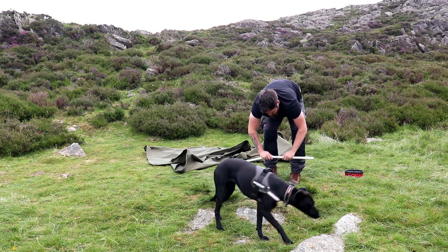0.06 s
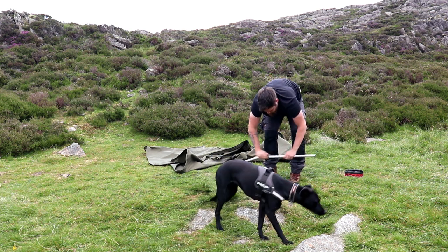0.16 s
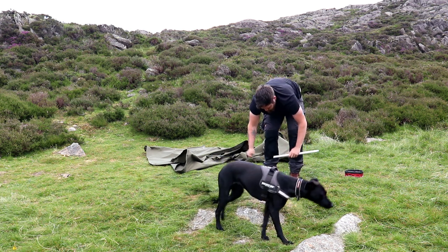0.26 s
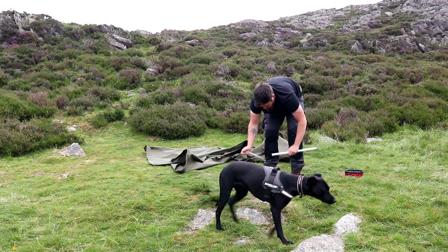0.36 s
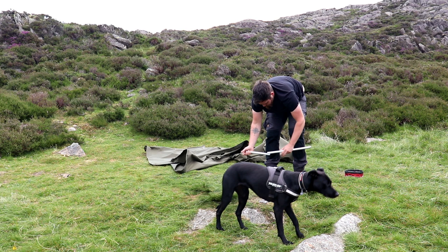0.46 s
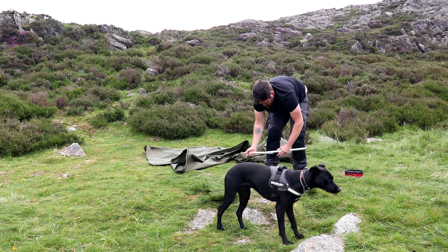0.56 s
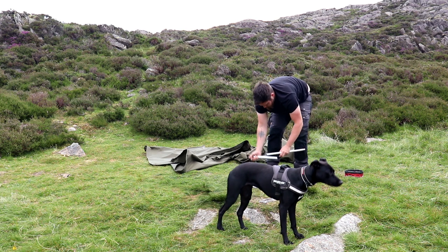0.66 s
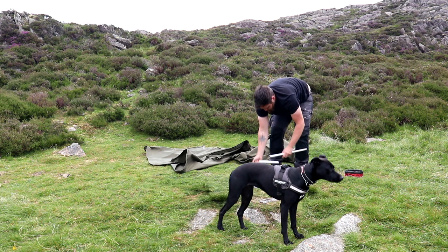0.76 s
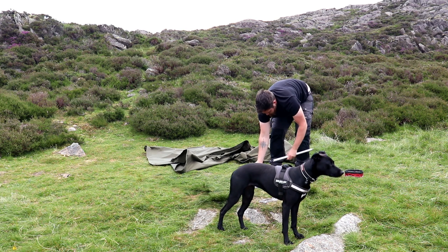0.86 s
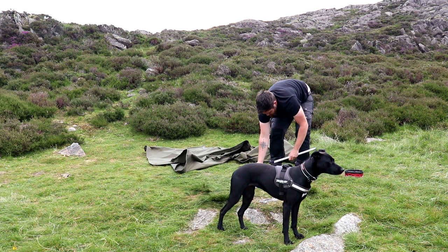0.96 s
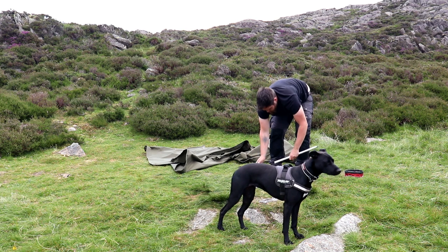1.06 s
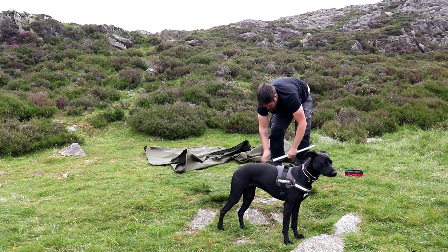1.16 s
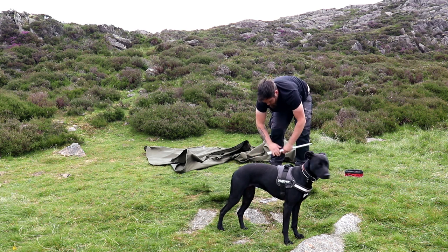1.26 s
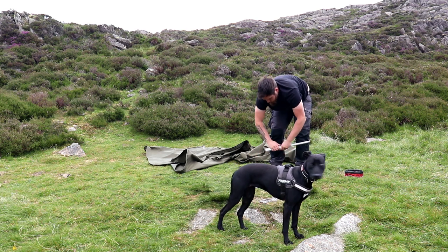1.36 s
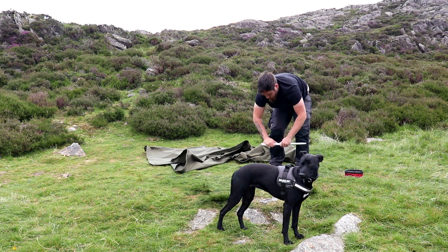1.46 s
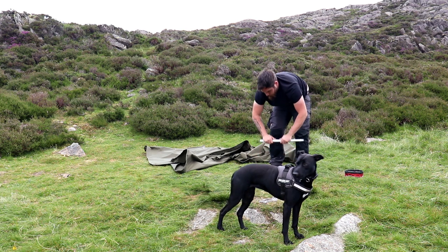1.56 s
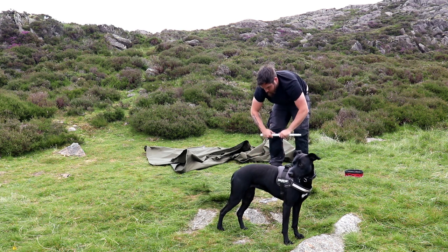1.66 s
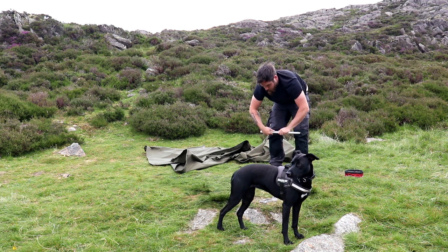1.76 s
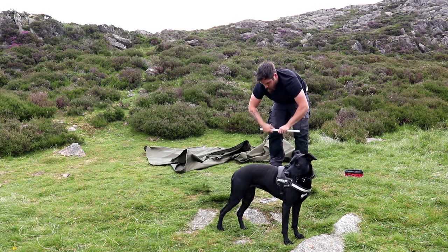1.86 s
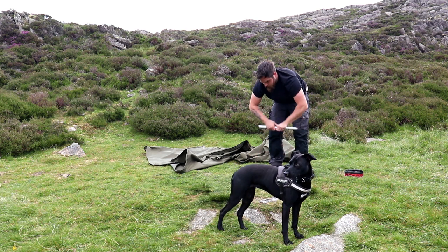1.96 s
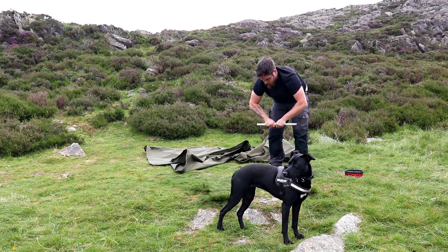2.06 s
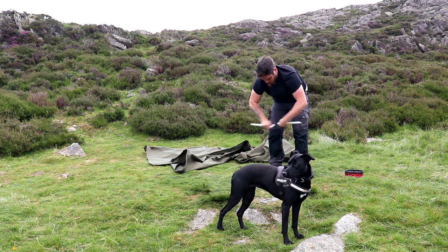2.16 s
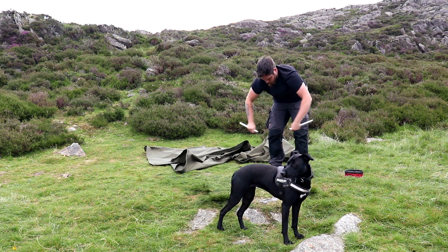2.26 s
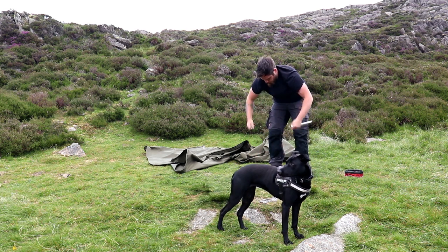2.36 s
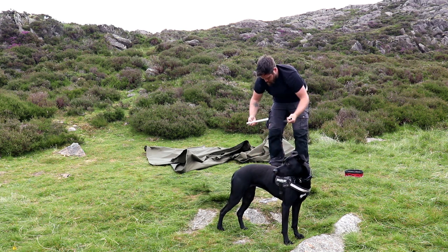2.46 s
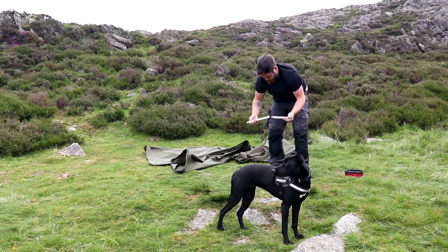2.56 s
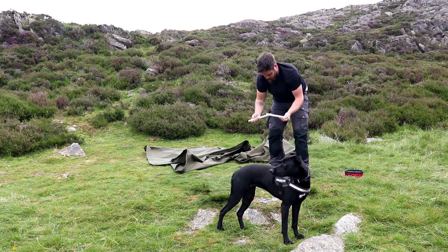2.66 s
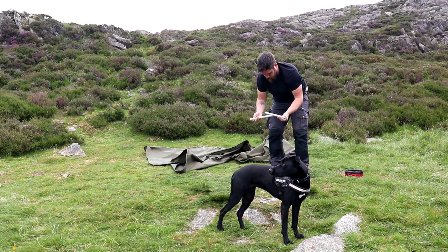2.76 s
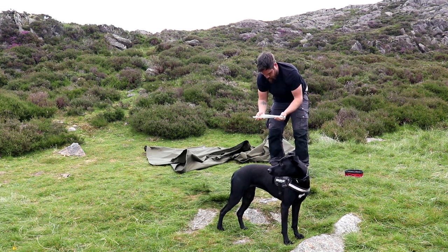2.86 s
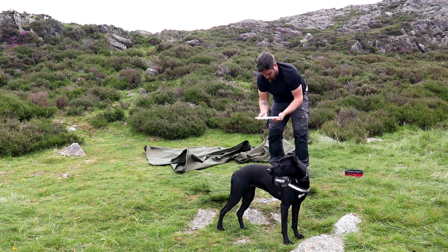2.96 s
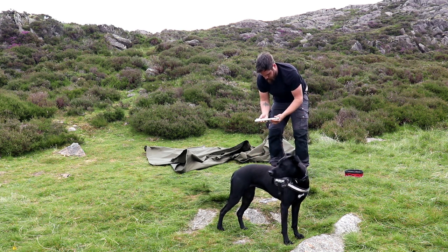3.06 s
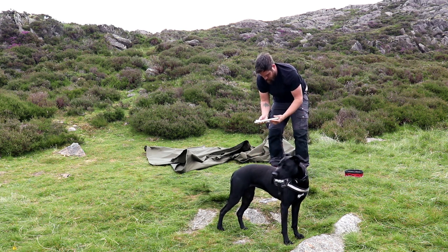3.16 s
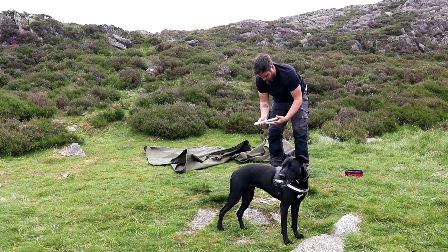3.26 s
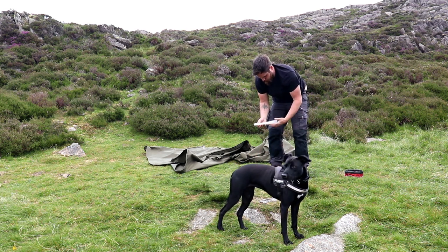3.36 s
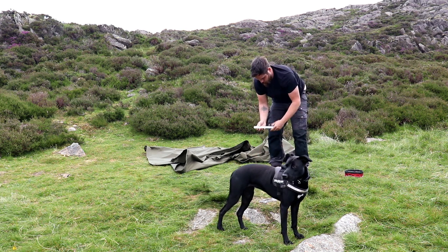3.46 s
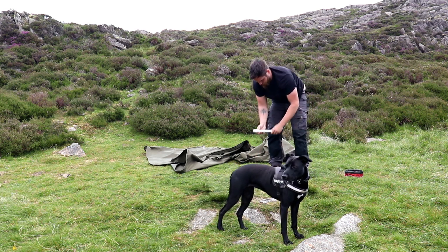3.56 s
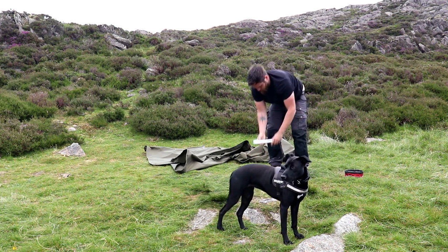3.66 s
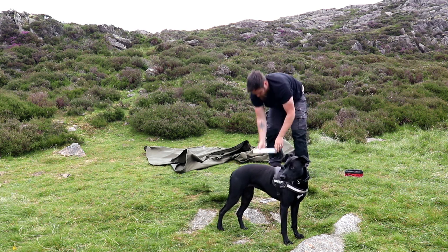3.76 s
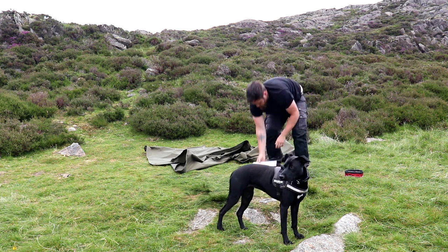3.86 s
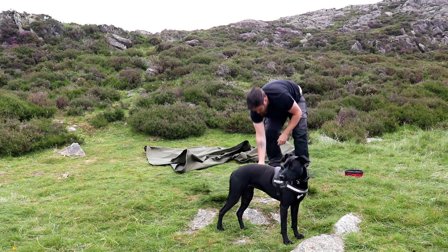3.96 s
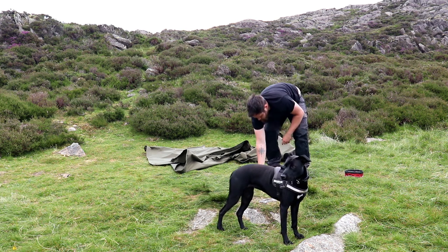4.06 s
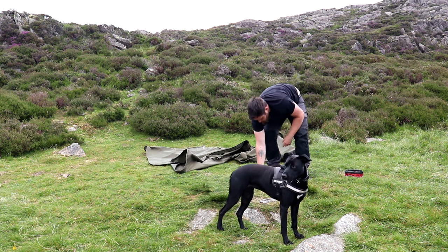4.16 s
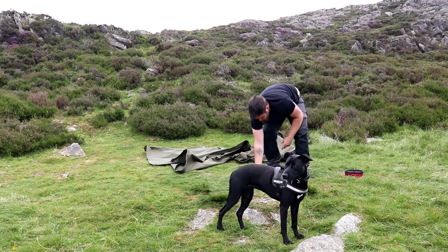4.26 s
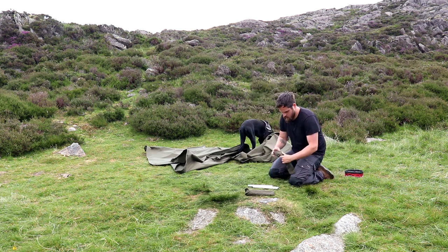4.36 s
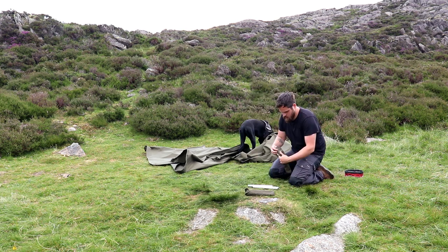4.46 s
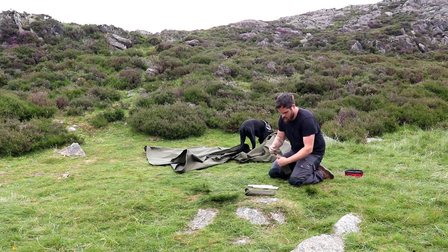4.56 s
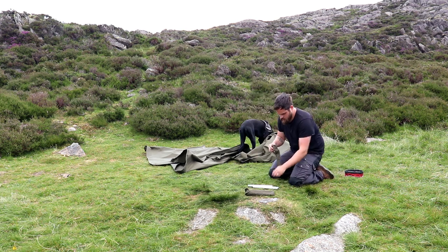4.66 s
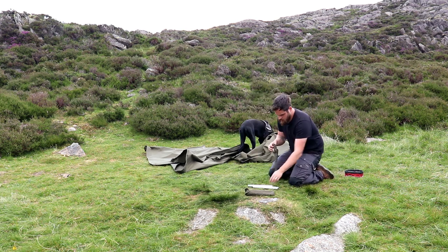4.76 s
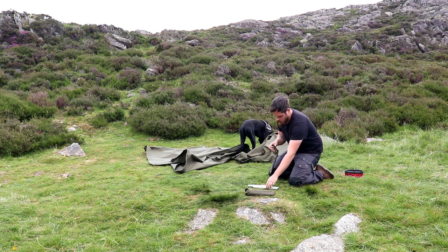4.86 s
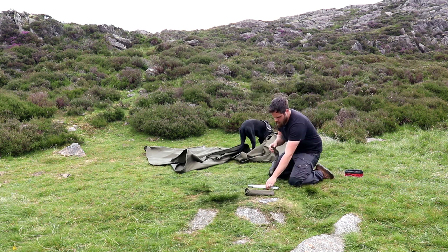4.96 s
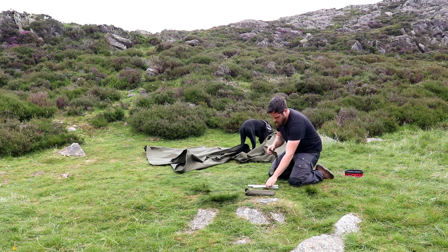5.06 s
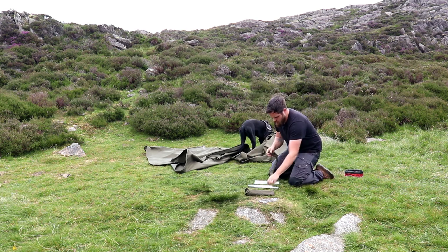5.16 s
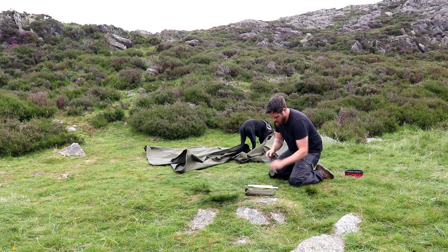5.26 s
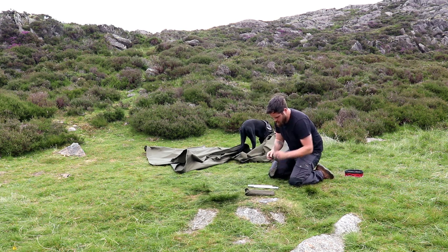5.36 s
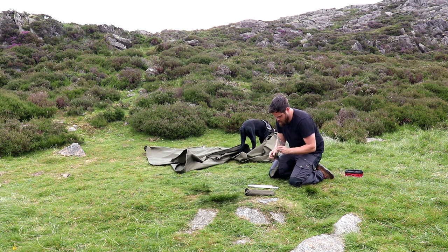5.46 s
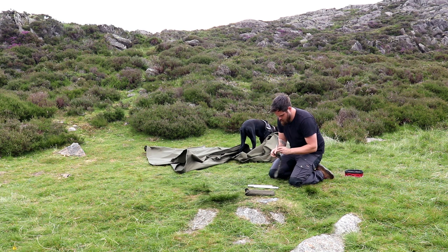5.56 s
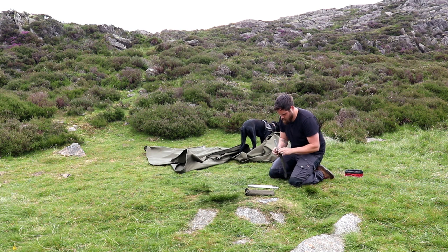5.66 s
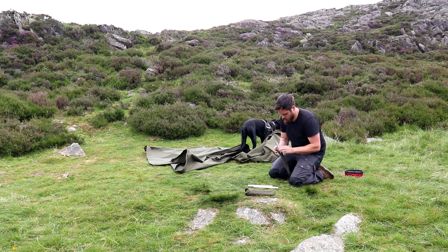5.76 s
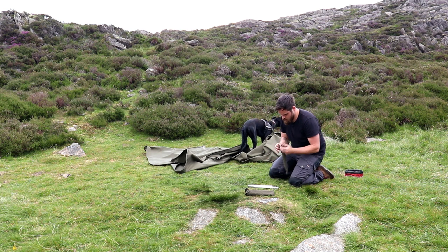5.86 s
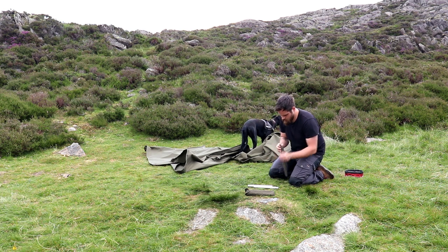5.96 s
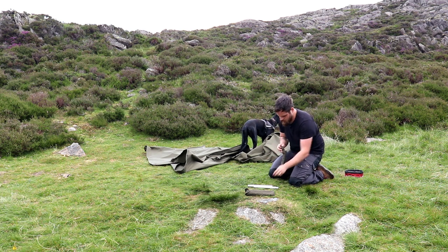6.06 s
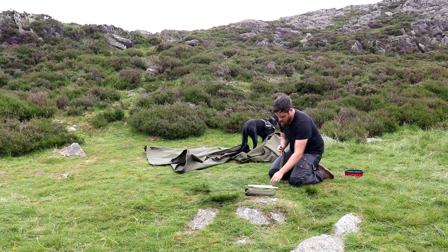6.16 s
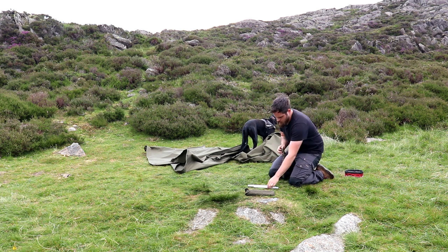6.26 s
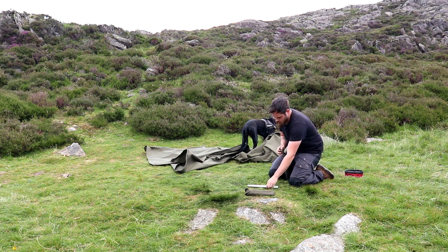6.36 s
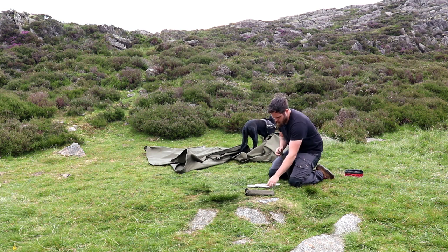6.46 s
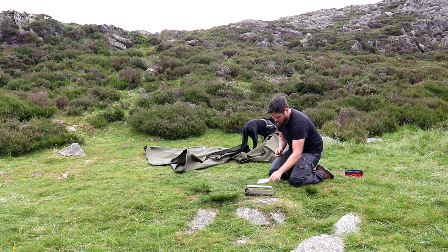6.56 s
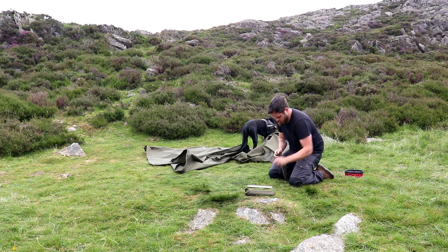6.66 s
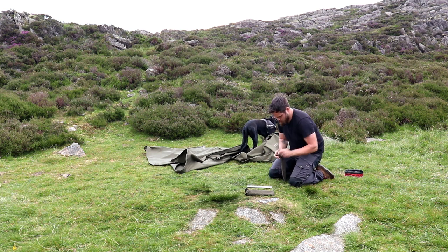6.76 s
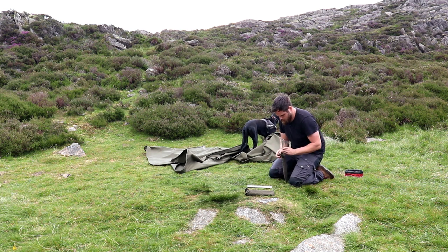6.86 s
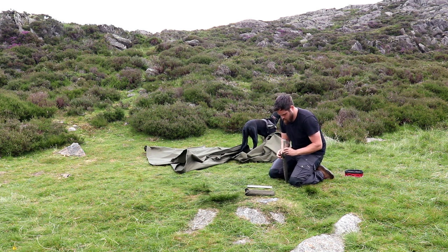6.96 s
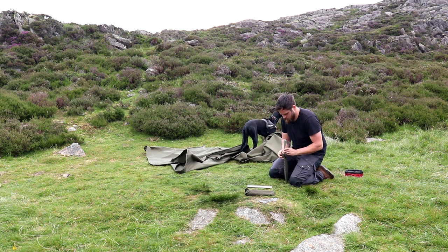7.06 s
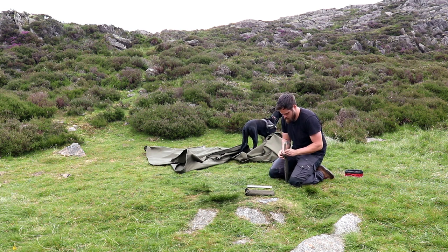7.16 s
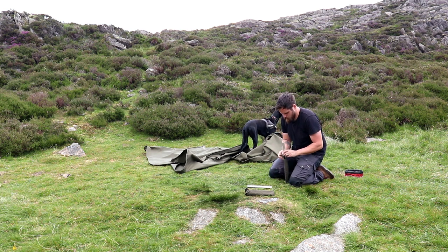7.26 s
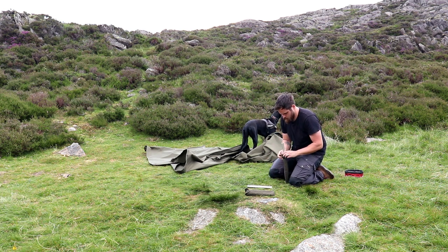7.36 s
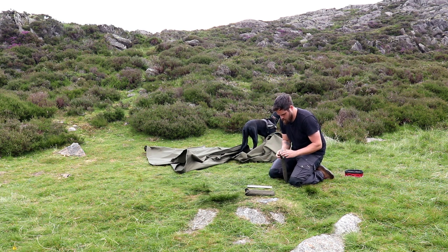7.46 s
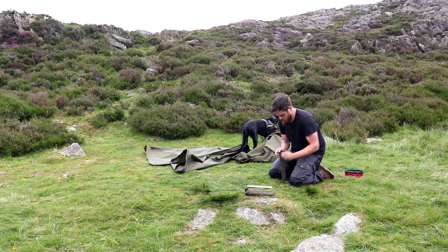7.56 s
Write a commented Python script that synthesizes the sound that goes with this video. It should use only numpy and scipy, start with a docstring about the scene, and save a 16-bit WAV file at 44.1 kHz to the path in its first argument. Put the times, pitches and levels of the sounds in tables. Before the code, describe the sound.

Thin metal tent pole sections click, clink and rattle brightly as they are pulled apart and gathered on a quiet, breezy open hillside.

```python
"""A soft wind rumble and airy hiss come first, then a metal joint clicks and jerks loose on a quiet hillside.
Tent pole sections are pulled apart, gathered in the hand, slid together and laid down. Each contact sets
decaying tube modes ringing and beating until the next touch or the hand stops them, and cracks sharply.
Filtered noise makes the knocks, a short squeak, scrapes, rustles of clothes and grass, breeze and air;
damped sines make the thuds, and swooping sines a small bird far off."""
import sys
import numpy as np
from scipy import signal
from scipy.fft import rfft, irfft
from scipy.io import wavfile
from scipy.ndimage import uniform_filter1d

SR = 44100
rng = np.random.default_rng(int(sys.argv[2]) if len(sys.argv) > 2 else 0)


def unload_audio(sound):
    """Save the sound as a 16-bit wav file, at the path given as the first command line argument."""
    columns = np.transpose(np.atleast_2d(sound))
    # keep every value between -1 and 1, then stretch to whole-number steps
    steps = np.round(np.clip(columns, -1, 1) * 32767)
    wavfile.write(sys.argv[1], SR, steps.astype(np.int16))


N = 335601
TIME, HZ = np.arange(N) / SR, np.fft.rfftfreq(N, 1 / SR)

# clinks of loose tubes: picked up and gathered, slapped in the palm, dropped on the pile, handled at the end:
# (time [s], lowest mode level [dB], second mode level [dB], upper modes level [dB], crack level before
# the common crack gain [dB], t60 before its floor [s], shorter tube's share of the ring [0-1],
# length of the rattle that follows [s])
CLINKS = [ (1.0906, -32.5, -28, -32, -38, .3, 0.52, 0.0042),
          (1.116, -28.5, -31.5, -42, -49, 1, 0.94, 0.016), (1.149, -25, -45, -36.5, -36, 0.19, 1, 0.012),
          (1.166, -24.5, -35, -35.5, -38, 0.17, .6, 0.0023),
          (1.177, -34, -27.5, -32, -38, 0.37, 0.97, 0.0017),
          (1.192, -30.5, -26.5, -24.5, -27.5, 0.49, 0.92, .02),
          (1.2134, -29.5, -26.5, -26.5, -30.5, 0.17, .7, 0.057),
          (1.271, -42.5, -42.5, -46, -68, 0.22, .97, 0), (1.313, -18, -41, -36.5, -53, 0.24, 0, 0.016),
          (1.326, -20.5, -50, -23, -33, 0.14, 0.16, 0.0033), (1.339, -24, -37, -33.5, -33, 0.24, 0.02, 0),
          (1.376, -29, -38.5, -35.5, -38, 0.12, 0, 0.054), (1.427, -35, -61, -50, -60, .3, 0.4, 0.0038),
          (1.525, -55.5, -68, -56, -50, .22, .6, 0.0027), (1.634, -54, -70, -64, -65, .5, 0.81, 0.033),
          (1.681, -46.5, -58, -49, -62, 0.15, .5, 0), (1.726, -33.5, -45.5, -42, -37.5, .18, 0.82, 0.016),
          (3.4598, -16.5, -34, -15.5, -24, 0.078, 0.01, 0.0013),
          (3.4792, -18, -17.5, -19.5, -20, 0.043, 0.82, 0.00078),
          (3.4865, -22.5, -26, -26, -25, .06, 0.69, 0.0023), (3.4934, -26, -18, -22, -30, 0.023, 0.7, .012),
          (3.5167, -46.5, -61, -51, -48, 0.23, 0.1, 0.037),
          (3.581, -62, -43, -48.5, -52, 0.062, 0.73, 0.0035),
          (3.589, -52, -55, -58.5, -43.5, .13, .5, 0.0122), (3.788, -38.5, -49.5, -41, -43, 0.1, 0.3, 0),
          (4.2353, -23, -36, -43, -40, .2, 0.02, 0), (4.243, -19.5, -25, -27.5, -25, .25, 0.67, 0.0014),
          (4.2591, -25, -22, -15, -26, .2, 1, 0.0083), (4.2621, -16, -29, -18.5, -20, 0.16, 0.63, .004),
          (4.2718, -19, -34, -20, -30, 0.27, .3, 0.0076),
          (4.2919, -19.5, -15.5, -23, -30, 0.19, 0.13, 0.0003),
          (4.3085, -16, -33.5, -26, -35.5, 0.26, 0.99, 0.0022),
          (4.3142, -17.5, -29.5, -25.5, -29.5, 0.31, 0.78, 0.025),
          (4.346, -16, -39, -28, -33, 0.32, .43, 0.00084), (4.36, -15.5, -32, -27, -37, 0.0084, 0.5, 0),
          (5.238, -45, -57, -56, -54, 0.062, 0.3, 0.0059),
          (6.3747, -29, -57, -31.5, -38, 0.056, 0.21, 0.00087),
          (6.3834, -38, -44, -28, -33, .085, 0, 0.028), (6.453, -48.5, -55, -41, -45, 0.087, 0.1, 0.0048),
          (7.2514, -31.5, -39.5, -59, -39, .03, 0.19, 0.013),
          (7.435, -53, -48, -45, -48, .15, 0.31, 0.00059), (7.46, -54, -50, -48, -49, 0.74, 0.05, 0.025),
          (7.4912, -23.5, -44, -37, -34, 0.22, 0.02, 0.052),
          (7.549, -31.5, -51, -38.5, -46, 0.05, 0.25, 0.0077),
          (7.564, -32, -55, -39, -38.5, 0.077, .3, 0.017), (7.584, -47, -51, -42.5, -43, 0.23, 0.28, .02)]


def amp(db):
    """Decibels to gain."""
    return 10 ** (np.asarray(db) / 20)


def evened(x):
    """Scales to rms 1."""
    return x / np.sqrt(np.mean(x ** 2) + 1e-20)


def add(mix, s, sound):
    """Mixes a sound in at time s, cutting it off at the end of the mix."""
    part = mix[max(round(s * SR), 0):][:len(sound)]
    part += sound[:len(part)]


def noise(points):
    """Steady noise of rms 1 with the given spectrum."""
    hz, db = np.transpose(points)
    gain = amp(np.interp(np.log(HZ + 1), np.log(hz), db))
    return evened(irfft(rfft(rng.standard_normal(N)) * gain, N))


def hump(x, hz, octaves, steepness=2.35):
    """Colours x with one broad resonance whose skirts fall steeply, at rms 1."""
    away = np.log2((np.fft.rfftfreq(len(x), 1 / SR) + 1) / hz) / octaves
    gain = 1 / (1 + away ** 2 / steepness) ** steepness
    return evened(irfft(rfft(x) * gain, len(x)))


def causal(points, size=2048):
    """The shortest click (minimum phase) that has the given spectrum, with energy 1."""
    hz, db = np.transpose(points)
    bins_hz = abs(np.fft.fftfreq(size, 1 / SR))
    log_gain = np.log(amp(np.interp(np.log(bins_hz + 1), np.log(hz), db)))
    click = np.fft.ifft(np.exp(np.conj(signal.hilbert(log_gain)))).real[:size // 2]
    return click / np.linalg.norm(click)


def grains(depth_db):
    """Friction: noise that catches and slips in grains of a few milliseconds."""
    slip = evened(uniform_filter1d(rng.standard_normal(N), size=130))
    return evened(rng.standard_normal(N) * amp(depth_db * slip))


def hillside(air_db=-56.5, side_db=-17.5, breeze_db=-3, breeze_hz=41.3, breeze_octaves=1.):
    """Even hiss of open air and a soft rumble of wind, nearly the same in both ears."""
    # spectrum of the open air: (frequency [Hz], relative level [dB per Hz])
    air = [(15, -34), (25, -7.5), (70, -9), (134, -9.5), (263, -9.5), (344, -10), (373, -9.5), (531, -12),
           (1190, -15.5), (1520, -14.5), (1650, -17), (4370, -21), (7110, -21.5), (16000, -27.5)]
    # breeze on the microphone: (time [s], level before the breeze_db trim [dB])
    breeze = [(0.0, -71), (0.08, -62.5), (2.82, -54.5), (3.85, -72), (4.0, -52), (4.32, -68), (4.36, -61),
              (5.16, -66), (6.84, -74), (6.94, -54.5), (7.03, -67), (7.6, -60)]
    gust = amp(np.interp(TIME, *np.transpose(breeze)) + breeze_db)

    def air_and_wind():
        """One independent layer of hiss and rumble."""
        rumble = hump(rng.standard_normal(N), breeze_hz, breeze_octaves)
        return amp(air_db) * noise(air) + gust * rumble

    mid, side = air_and_wind(), amp(side_db) * air_and_wind()
    return np.array([mid + side, mid - side])


def held_ring(blows, modes):
    """Sections gripped in both hands give a short, choked ring of damped sines."""
    t, out = np.arange(SR // 6) / SR, np.zeros(N)
    for s, low_db, other_db, t60, pitch, rise in blows:
        for k, (hz, db, lasting) in enumerate(modes):
            level_db = (other_db if k else low_db) + db
            swing = amp(level_db - 60 * t / (t60 * lasting)) * (1 - np.exp(-t / rise))
            wave = np.sin(2 * np.pi * (hz * pitch * t + rng.random()))
            add(out, s, np.sqrt(2) * swing * wave)
    return out


def scrapes(strokes, spectrum, rise_s=0.00048, grain_db=1.0):
    """Metal drags over metal. Each stroke is (s, dB, hold s, t60 s): it holds, then dies away."""
    t, level = np.arange(SR // 4) / SR, np.zeros(N)
    for s, db, hold_s, t60 in strokes:
        fall_db = 60 * np.maximum(t - hold_s, 0) / t60
        add(level, s, amp(db - fall_db) * (1 - np.exp(-t / rise_s)))
    return level * signal.oaconvolve(grains(grain_db), causal(spectrum))[:N]


def joint(scrape_db=-3.0, hold_s=0.0049, release_s=0.024):
    """The joint is worked loose in jerks; each one rings and scrapes briefly."""
    # modes of two sections still joined: (frequency [Hz], relative level [dB], factor on t60 [ratio])
    joined_modes = [(1296, -10, 0.53), (2000, -4, 0.73), (2620, -1.5, 1.04), (2760, 2, 0.39),
                    (4050, -29, 0.46), (4400, 7.5, 0.39), (5300, 6, 0.31), (6770, -4.5, 2.05),
                    (7970, -4, 1.2)]
    # jerks at the joint: (time [s], lowest mode level [dB], other modes level [dB], t60 [s],
    # pitch factor [ratio], rise [s])
    jerks = [(0.182, -43, -32.5, 0.04, 1.04, 0.0011), (.1885, -33, -38.5, 0.057, 1.005, 0.00028),
             (2.186, -33, -31.5, 0.033, 1.05, 0.0014), (2.1986, -36, -29, 0.017, 1.02, 0.00028),
             (2.2062, -26, -33, 0.011, 1.36, 0.00042)]
    # scrape of wall on wall: (frequency [Hz], relative level [dB per Hz])
    wall_spectrum = [(200, -24), (900, -10.5), (2500, -1), (4300, -6), (7000, 0.5), (11000, -12.5),
                     (16000, -20)]
    strokes = [(s, db + scrape_db, hold_s, release_s) for s, _, db, *_ in jerks]
    return held_ring(jerks, joined_modes) + scrapes(strokes, wall_spectrum)


def thuds(rise_s=0.00045):
    """Hollow pops of the air in a tube and thuds on the turf: one low damped swing each."""
    # (time [s], level [dB], frequency [Hz], t60 [s])
    low_hits = [(0.182, -54, 176, 0.29), (1.044, -37.5, 208, 0.024), (1.064, -22.5, 253, 0.011),
                (1.069, -44.5, 172, 0.094), (1.192, -44.5, 615, 0.11), (1.312, -42.5, 339.5, 0.39),
                (2.185, -39, 185, 0.087), (2.208, -50, 620, 0.21), (7.249, -51.5, 344, 0.28)]
    t, out = np.arange(SR // 3) / SR, np.zeros(N)
    for s, db, hz, t60 in low_hits:
        swing = amp(db - 60 * t / t60) * (1 - np.exp(-t / rise_s))
        add(out, s, np.sqrt(2) * swing * np.sin(2 * np.pi * hz * t))
    return out


def bird(swoop_from=.83, swoop_to=.66, turn=.7, waver=.017):
    """Thin, distant whistles: sines whose pitch swoops up and down with a fine random waver."""
    # syllables: (time [s], length [s], level [dB], top pitch before smoothing and waver [Hz],
    # share of the syllable held low before the rise [0-1])
    syllables = [(0.303, 0.08, -58, 6500, 0), (.489, 0.039, -55.5, 6200, 0.028),
                 (0.595, 0.086, -55.5, 5700, 0.45), (.796, .03, -61, 5900, 0), (.915, .035, -64, 6300, 0),
                 (4.409, 0.084, -58.5, 7150, .3)]
    out = np.zeros(N)
    drift = 1 + waver * evened(uniform_filter1d(rng.standard_normal(N), size=60))
    for s, length, db, top_hz, held in syllables:
        u = np.linspace(0, 1, round(length * SR))
        # start and end pitch are shares of the top, which comes at the turn of the syllable
        swoop = np.interp(u, [held, np.clip(turn, held, 1), 1], [swoop_from, 1, swoop_to])
        hz = top_hz * uniform_filter1d(swoop, size=400) * drift[round(s * SR):][:len(u)]
        whistle = np.sin(2 * np.pi * np.cumsum(hz) / SR)
        add(out, s, np.sqrt(2) * amp(db) * signal.windows.tukey(len(u), .4) * whistle)
    return out


def rustles(grain_db=2.5):
    """Each stroke over cloth, grass or a tube swells and fades as friction noise in one band."""
    # cloth and grass rustle (wide bands), a rubbed tube sings (narrow bands):
    # (time [s], length [s], level before the fades [dB], centre [Hz], width [octaves])
    rubs = [(0.385, 0.22, -51, 530, 1.9), (0.694, 0.12, -51.5, 900, 1.33), (0.775, 0.071, -46.5, 646, 1.7),
            (1.187, 0.073, -42.5, 3000, 0.66), (1.703, 0.044, -46.5, 2000, 0.33),
            (1.818, 0.36, -61, 1506, 0.21), (3.125, 0.052, -52.5, 1200, 0.11), (3.577, .11, -57, 3900, 1.5),
            (4.442, 0.22, -59, 1894, 1.7), (5.648, 0.091, -51.5, 2270, 1.8), (5.702, 0.64, -65, 300, 1),
            (5.833, 0.22, -53.5, 1200, 2), (6.168, 0.38, -58, 614, 1), (6.37, 0.046, -40, 2224, 0.28),
            (7.31, .12, -53, 1358, 1.55), (7.418, .077, -46, 7950, 0.054), (7.42, 0.046, -44, 4850, 0.042),
            (7.486, 0.15, -47.5, 2657, 0.33)]
    out, friction = np.zeros(N), grains(grain_db)
    for s, length, db, hz, octaves in rubs:
        stroke = friction[round(s * SR):][:max(round(length * SR), 64)]
        swell = signal.windows.tukey(len(stroke), .6)
        add(out, s, amp(db) * hump(stroke, hz, octaves) * swell)
    return out


def knocks(octaves=0.52, rise_s=0.00013):
    """Dull blows on firmly held gear, and one short squeak near 1450 Hz: banded noise that dies quickly."""
    # hands, gear and tube ends, and the squeak at 5.756 s:
    # (time [s], level before the decay [dB], centre [Hz], t60 [s])
    bursts = [(.51, -41.5, 1690, 0.046), (0.817, -41, 2900, 0.042), (.906, -35.5, 920, 0.013),
              (1.09, -19, 1620, 0.014), (1.3117, -22, 1660, 0.02), (2.124, -42, 2330, 0.019),
              (2.208, -29, 1840, 0.017), (3.0745, -18, 3140, .012), (3.4797, -16.5, 3593, 0.017),
              (3.241, -42, 1840, 0.042), (3.258, -42.5, 2900, 0.041), (3.3, -49, 1780, .045),
              (4.496, -46.5, 1200, 0.027), (5.756, -46.5, 1450, 0.094), (5.842, -45, 1200, .049),
              (5.997, -38, 1300, 0.035), (6.3739, -36, 1490, 0.11), (7.2509, -23.5, 1330, 0.016),
              (7.26, -37, 1350, 0.055)]
    t, out = np.arange(SR // 8) / SR, np.zeros(N)
    for s, db, hz, t60 in bursts:
        swing = amp(db - 60 * t / t60) * (1 - np.exp(-t / rise_s))
        add(out, s, swing * hump(rng.standard_normal(len(t)), hz, octaves))
    return out


def contacts(count=12, gap_s=.0062, uneven=.4, scatter_db=3, rebound_db=-6.5, rebound_scatter_db=8):
    """Each clink, then the unevenly spaced rebounds of its rattle, which fade with the ring."""
    s, low_db, second_db, upper_db, crack_db, t60, share, rattle_s = np.transpose(CLINKS)[:, :, None]
    gap, ring_luck, crack_luck = rng.standard_normal((len(s), count, 3)).transpose(2, 0, 1)
    rebound, t60 = np.arange(count) > 0, np.maximum(t60, .01)
    delay = np.cumsum(rebound * gap_s * np.exp(uneven * gap), 1)
    fade_db = -60 * delay / t60
    ring_db = fade_db + rebound * scatter_db * np.minimum(ring_luck, .5)
    # crack of a rebound against that of its clink
    crack_db = crack_db + fade_db + rebound * (rebound_db + rebound_scatter_db * crack_luck)
    # rebounds that never come have no time (inf)
    when = np.where(delay <= np.maximum(rattle_s, 0), s + delay, np.inf)
    levels = low_db + ring_db, second_db + ring_db, upper_db + ring_db, crack_db
    columns = when, *levels, t60, np.clip(share, 0, 1)
    return np.array(np.broadcast_arrays(*columns)).reshape(len(columns), -1)


def tube(touches, modes, share, second_share, jolt=0.548, upper_jolt=1.098, scatter_db=3.2,
         contact_s=0.00035, grip=.0004, twin=0.31, split_hz=102):
    """Every contact sets each mode's swing anew and jolts its phase; it then dies at the rate the grip allows."""
    s, low_db, second_db, upper_db, _, t60, _ = touches
    order = np.argsort(s)
    # the latest touch before each sample, kept only where its ring still lasts
    last = order[np.maximum(np.searchsorted(s[order], TIME, "right") - 1, 0)]
    ringing = (TIME >= s[last]) & (TIME < s[last] + t60[last])
    last, t = last[ringing], TIME[ringing]
    fall_db = 60 * (t - s[last]) / t60[last]
    ease, out = np.exp(-1 / (contact_s * SR)), np.zeros(N)
    for k, (hz, db, lasting) in enumerate(modes):
        kick, luck, pull, facing = rng.standard_normal((len(s), 4)).T
        # the place of the blow favours some upper modes over others
        level_db = (low_db, second_db, upper_db + scatter_db * luck)[min(k, 2)]
        phase = np.cumsum(kick * np.isfinite(s) * (jolt if k < 2 else upper_jolt))
        mode_share = np.sqrt(second_share if k == 1 else share)
        start = amp(level_db + db) * mode_share * np.exp(1j * phase)
        swing = start[last] * amp(-fall_db / lasting)
        if k >= 2:  # the tube is not quite round, so its upper modes come in beating pairs
            beat = np.exp(1j * (2 * np.pi * split_hz * t + facing[last]))
            swing = swing * (1 + twin * beat) / np.hypot(1, twin)
        # a firm grip also pulls the pitch a little
        pitch = hz * (1 + pull * grip / np.maximum(t60, .05))[last]
        eased = signal.lfilter([1 - ease], [1, -ease], swing)
        carrier = np.exp(2j * np.pi * np.cumsum(pitch) / SR)
        out[ringing] += np.sqrt(2) * (eased * carrier).real
    return out


def rings(touches, swap_s=2.5):
    """The long section rings with the middle one, its second mode muted by the hand, then freely with the short."""
    # modes of the three sections: (frequency [Hz], relative level [dB], factor on t60 [ratio])
    long_modes, middle_modes, short_modes = [(1911, 0, 1), (4926, 0, 1), (6726, -7, 1), (7102, -6, 1),
                                             (7884, -7, 1), (9090, -10, .7), (10090, -25, .7),
                                             (11480, -24, .6), (13570, -27, .6)], [(2023, 0, 1), (5166, 0, 1.2),
                                                                (6805, -6, 1.2), (7110, -6, 1),
                                                                (7856, -8, 1), (9110, -8, .8),
                                                                (10100, -24, .7), (11500, -22, .7),
                                                                (13700, -26, .7)], [(2055, 0, 1),
                                                                                     (5242, 0, 1),
                                                                                     (6780, -7, 1),
                                                                                     (7152, -8, 1),
                                                                                     (7930, -5, 1),
                                                                                     (9165, -6, .9),
                                                                                     (10260, -23, .8),
                                                                                     (11560, -20, .8),
                                                                                     (13750, -19, .8)]
    share, early = touches[-1], touches[0] < swap_s
    # the shorter tube's share of the whole ring, and of the second mode
    shares = np.array([share, np.where(early, 1, share)])
    long_ring = tube(touches, long_modes, *(1 - shares))
    middle_ring = tube(touches, middle_modes, *(shares * early))
    short_ring = tube(touches, short_modes, *(shares * ~early), twin=1.3)
    return long_ring + middle_ring + short_ring


def cracks(touches, crack_db=23.5, grit_db=-22.5, grit_t60=0.017, soft_hz=4900.0, usual_db=-43,
           hardening=0.39):
    """A sharp, slightly gritty crack at each contact: a click and fading noise, coloured as metal on metal."""
    # spectrum of the crack: (frequency [Hz], relative level [dB per Hz])
    crack_spectrum = [(100, -43), (500, -16), (900, -12), (1400, -5), (2600, -1.5), (4200, -1.5),
                      (5400, -2.5), (6300, -12), (7300, 0.5), (9200, 1.5), (11000, -10.5), (14000, -1.5),
                      (16000, -35.5)]
    t, force = np.arange(SR // 30) / SR, np.zeros(N)
    grits = rng.standard_normal((touches.shape[1], len(t)))
    for s, db, grit in zip(touches[0], touches[4], grits):
        if np.isfinite(s):
            blow = (t == 0) + amp(grit_db - 60 * t / grit_t60) * grit
            # a harder blow has a shorter contact, so it is brighter
            top_hz = min(soft_hz * amp(hardening * (db - usual_db)), SR / 3)
            add(force, s, amp(db) * signal.lfilter(*signal.butter(2, top_hz, fs=SR), blow))
    return amp(crack_db) * signal.oaconvolve(force, causal(crack_spectrum))[:N]


def rattle_scrapes(scrape_db=-13, hold_share=0.463, release_s=0.075):
    """While they rattle, the tubes also drag along each other."""
    # scrape of loose tubes: (frequency [Hz], relative level [dB per Hz])
    loose_spectrum = [(200, -18), (900, -4.5), (1500, 2.5), (2200, 7.5), (3000, 8.5), (4200, -1),
                      (6200, -14.5), (7500, 4), (10000, -5.5), (14000, -14.5), (16000, -24.5)]
    strokes = [(s, db + scrape_db, hold_share * length, min(release_s, t60))
               for s, _, _, _, db, t60, _, length in CLINKS if length > 0]
    return scrapes(strokes, loose_spectrum)


def sleeve(scrape_db=-39, hold_s=0.029, release_s=0.3):
    """One tube enters another, scrapes along its wall, and hits home."""
    # modes of one section inside another: (frequency [Hz], relative level [dB], factor on t60 [ratio])
    sleeved_modes = [(2033, -3, 1), (1200, -18, 0.54), (2590, -14.5, 0.86), (3220, -6.5, 0.34),
                     (3880, -14.5, 0.82), (5220, -2.5, 0.92), (9110, -10, 0.31), (11500, -24, 0.64),
                     (13650, -33, 0.74)]
    # blows as it enters, catches on the wall and hits home: (time [s], lowest mode level [dB],
    # other modes level [dB], t60 [s], pitch factor [ratio], rise [s])
    slide_blows = [(3.0756, -15.5, -15.5, .06, 1.01, 0.00011), (3.096, -34, -26, 0.061, 0.98, .00035),
                   (3.111, -41, -24.5, .05, 1.02, .001), (3.166, -49, -27, .03, 1.025, .0024),
                   (3.1813, -50, -16, 0.021, 1.022, 0.0015)]
    # scrape of wall on wall: (frequency [Hz], relative level [dB per Hz])
    slide_spectrum = [(200, -22), (800, -7), (1200, -7), (1650, -6.5), (2650, -4), (3250, 2.5), (4400, -12),
                      (5300, -1), (6500, -14), (12500, -21), (16000, -31)]
    stroke = (slide_blows[0][0], scrape_db, hold_s, release_s)
    return held_ring(slide_blows, sleeved_modes) + scrapes([stroke], slide_spectrum)


def scene():
    """All the handling is straight ahead, with no walls to echo it."""
    touches = contacts()
    poles = rings(touches) + cracks(touches) + rattle_scrapes() + joint() + sleeve()
    return hillside() + poles + knocks() + thuds() + rustles() + bird()


def record(dry, edge_hz=16200):
    """Cuts the treble steeply above the band edge with a linear-phase low-pass."""
    low_pass = signal.firwin(401, edge_hz, window=("kaiser", 9), fs=SR)
    return signal.oaconvolve(dry, low_pass[None], "same", axes=1)


dry = scene()
out = record(dry)
unload_audio(out)
```